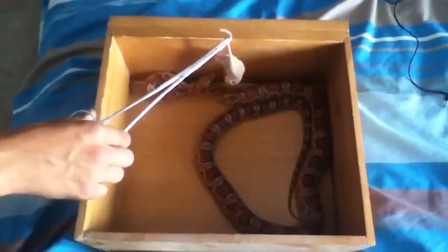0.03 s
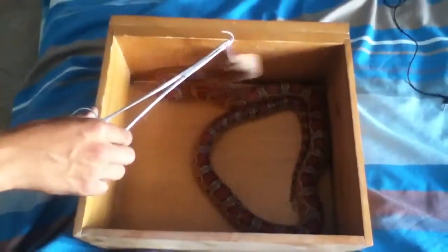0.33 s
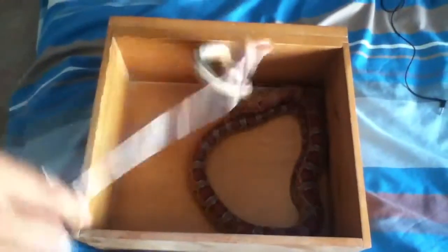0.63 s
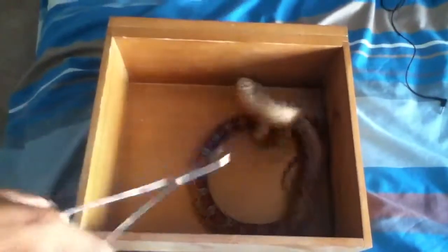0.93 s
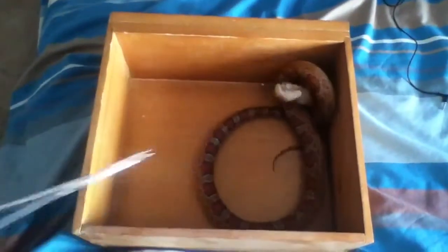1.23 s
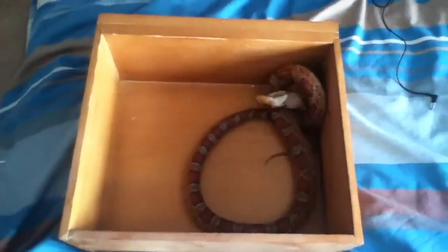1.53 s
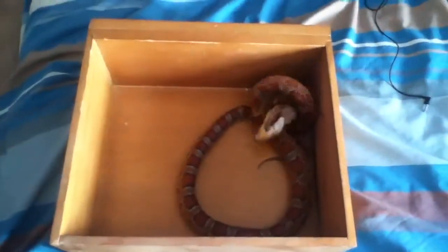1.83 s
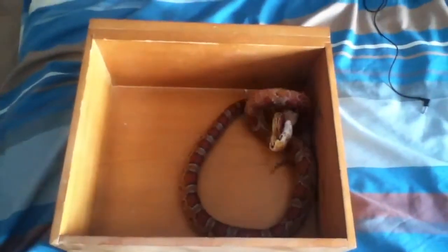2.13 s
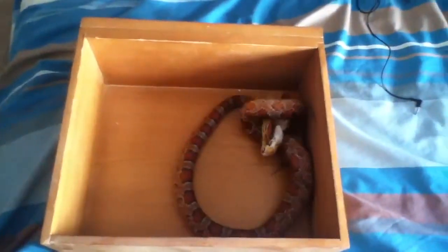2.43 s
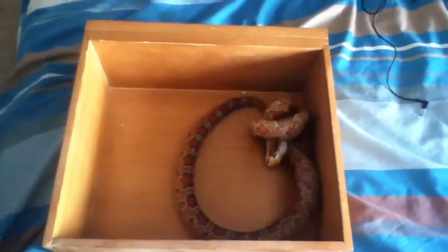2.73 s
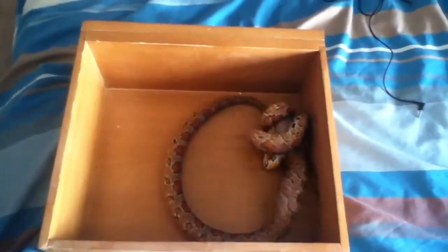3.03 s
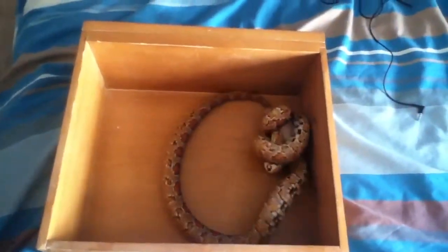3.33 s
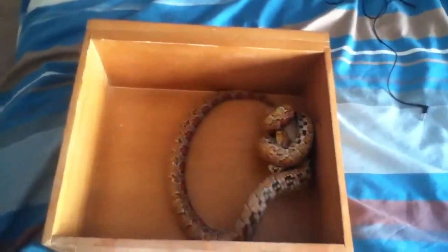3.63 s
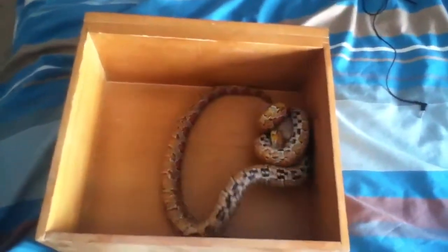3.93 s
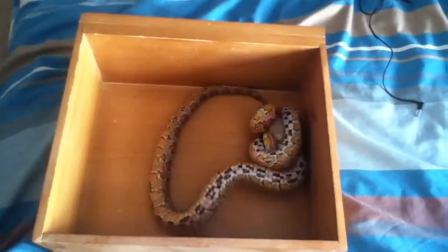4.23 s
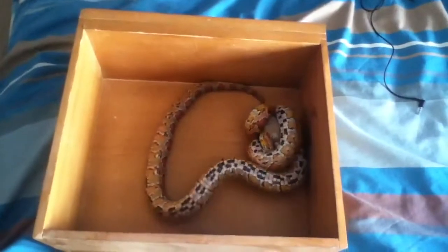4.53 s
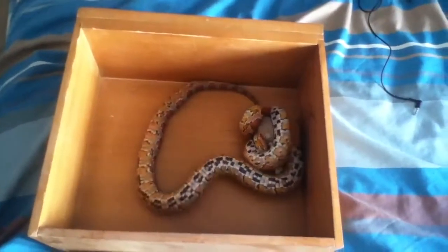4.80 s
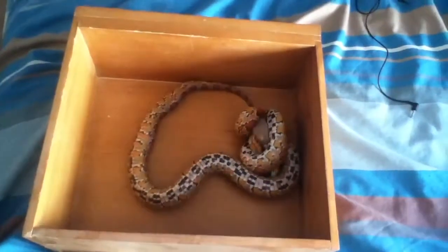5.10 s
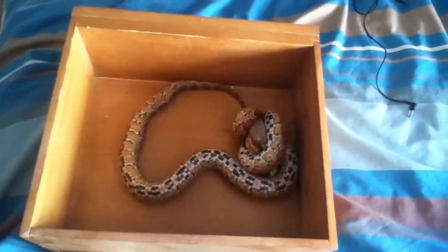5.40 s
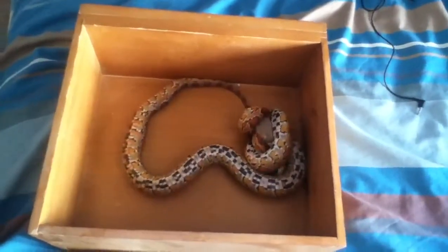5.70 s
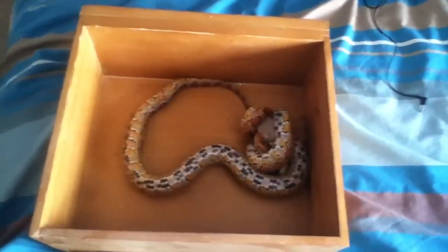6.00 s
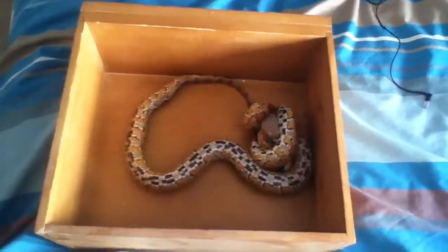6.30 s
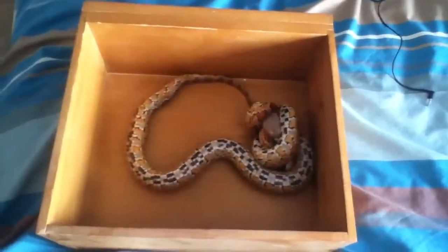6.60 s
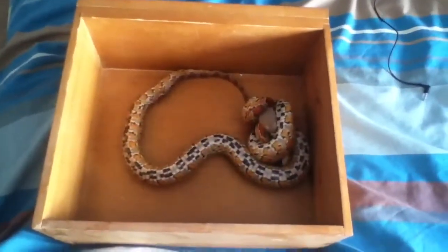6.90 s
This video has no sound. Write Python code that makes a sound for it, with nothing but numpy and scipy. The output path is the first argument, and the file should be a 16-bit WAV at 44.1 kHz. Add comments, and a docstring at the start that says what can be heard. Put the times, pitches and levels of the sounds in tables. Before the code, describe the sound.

Faint scuffs, then a single wooden thump with a hard snap as a snake lands with its prey, followed by very soft rustling.

```python
"""Room noise, microphone hiss and a few very faint high chirps run throughout.
A snake shifts in an open wooden box and at 0.6 s lunges at a mouse held out on steel tongs.
At 0.9 s both land on the box floor: one low thump rings the boards and the small room, with a hard snap.
Scales and fur rustle on, then the coils rub and nudge the wood."""
import sys
import numpy as np
from scipy import signal
from scipy.fft import rfft, irfft
from scipy.io import wavfile

SR = 44100
rng = np.random.default_rng(int(sys.argv[2]) if len(sys.argv) > 2 else 0)


def wav_record(signal):
    """Record a signal, one row per channel, as 16-bit PCM in the file named by sys.argv[1]."""
    frames = np.transpose(np.atleast_2d(signal))
    bounded = np.clip(frames, -1, 1)
    # unit amplitude maps onto the largest positive 16-bit level
    quanta = np.round(bounded * 32767).astype(np.int16)
    wavfile.write(sys.argv[1], SR, quanta)


N = 315315
T = np.arange(N) / SR


def undb(db):
    """Decibels to gain."""
    return 10 ** (np.asarray(db) / 20)


def unit(x):
    """Scale to rms 1."""
    return x / np.sqrt(np.mean(x ** 2))


def fade(t, t60_s):
    """Exponential decay from t = 0."""
    return (t >= 0) * np.exp(-np.log(1000) * np.maximum(t, 0) / t60_s)


def swell(middle_s, length_s):
    """Gaussian rise and fall, 9 dB down at both ends of its length."""
    return np.exp(-(2 * (T - middle_s) / length_s) ** 2)


def effort(moves, rest_gain):
    """Gain over time: swells add in power to a resting gain."""
    power = sum((undb(db) * swell(middle_s, length_s)) ** 2 for middle_s, length_s, db in moves)
    return np.sqrt(rest_gain ** 2 + power)


def butter(x, cutoff_hz, kind="low", order=2):
    """Butterworth filter."""
    return signal.sosfilt(signal.butter(order, cutoff_hz, kind, fs=SR, output="sos"), x)


def colour(x, points):
    """Shape the spectrum by (freq_hz, gain_db) points; rms 1."""
    hz, db = np.transpose(points)
    f = np.maximum(np.fft.rfftfreq(N, 1 / SR), 1)
    return unit(irfft(rfft(x) * undb(np.interp(np.log(f), np.log(hz), db)), N))


def band(x, hz, octaves):
    """Bell-shaped band; rms 1."""
    f = np.maximum(np.fft.rfftfreq(N, 1 / SR), 1)
    return unit(irfft(rfft(x) * np.exp(-.5 * (np.log2(f / hz) / octaves) ** 2), N))


def grit(spread_db, grain_samples=40):
    """Friction noise: short grains of random strength."""
    strength = undb(spread_db * rng.standard_normal(N // grain_samples + 1))
    return np.repeat(strength, grain_samples)[:N] * rng.standard_normal(N)


def ring(modes):
    """Free ringing of modes, 0.5 s; polarity 1 swings with the push, -1 against it."""
    t = T[:SR // 2]
    return sum(np.sign(polarity) * undb(db) * np.cos(2 * np.pi * hz * t) * fade(t, t60_s)
               for hz, db, t60_s, polarity in modes)


def background(air_db=-57.5, drone_hz=57.7, whine_hz=14993, whine_db=-89):
    """Room noise, microphone hiss, a wavering drone that swells once, a thin electronic whine."""
    # noise and hiss spectrum: freq_hz, density_db
    air_spectrum = [(12, -47), (20, -4), (27, -17), (47, -10), (81, -1.5), (112, 0.5), (219, -2), (259, -4),
                    (405, -6.5), (988, -15.5), (1200, -14.5), (2100, -17), (3870, -18), (10300, -20),
                    (15600, -25)]
    air = undb(air_db) * colour(rng.standard_normal(N), air_spectrum)
    drone_gain = undb(-76) + undb(-67.5) * swell(middle_s=1.54, length_s=.62)
    waver = band(rng.standard_normal(N), drone_hz, octaves=0.089)
    drone = drone_gain * unit(np.sin(2 * np.pi * drone_hz * T) + .5 * waver)
    whine = undb(whine_db) * unit(np.sin(2 * np.pi * whine_hz * T))
    return air + drone + whine


def chirps(length_s=.1, min_smear_hz=130, smear_share=.7):
    """Falling chirps, perhaps a distant bird; the steeper the fall, the more smeared."""
    # calls: middle_s, level_db, pitch_hz, fall_ratio
    calls = [(0.025, -70, 4070, 0.041), (0.395, -68, 4350, .02), (1.136, -68.5, 4340, 0.0235),
             (2.72, -64.5, 4600, 0.17), (3.93, -68, 4050, .06), (4.834, -67, 4270, .04)]
    noise, out = rng.standard_normal(N), 0
    for middle_s, db, hz, fall in calls:
        u = (T - middle_s) / length_s
        pitch_hz = hz * (1 - fall * np.clip(u, -1, 1))
        tone = np.sin(2 * np.pi * np.cumsum(pitch_hz) / SR)
        smear_hz = np.hypot(min_smear_hz, smear_share * fall * hz)
        blur = unit(butter(noise, smear_hz))
        out += undb(db) * np.exp(-2 * u ** 2) * blur * tone
    return np.sqrt(2) * out


def room(x, wet_db=-18, t60_s=0.306, first_wall_s=0.018, build_s=0.03, low_hz=340, high_hz=2800):
    """Small furnished room: midrange reflections thicken after the first wall, then die fast."""
    t = T[:SR // 2] - first_wall_s
    build = 1 - np.exp(-np.maximum(t, 0) / build_s)
    tail = rng.standard_normal(len(t)) * fade(t, t60_s) * build
    tail /= np.sqrt(np.sum(tail ** 2))
    tail = butter(tail, high_hz, order=1)
    tail = butter(tail, low_hz, "high")
    return x + undb(wet_db) * signal.fftconvolve(x, tail)[:N]


def rub(grip_db=-77.5):
    """Tightening coils drag along the wall; the wood murmurs."""
    # wood resonances: centre_hz, width_octaves, gain_db
    resonances = [(348, 0.54, 2.5), (532, 0.049, -7.5), (669, 0.086, -1)]
    # coil presses: middle_s, length_s, level_db
    squeezes = [(.03, 0.24, -62), (.62, 0.34, -63.5), (3.77, 0.18, -60), (4.7, 1.4, -70.5)]
    slips = grit(spread_db=4, grain_samples=300)
    murmur = unit(sum(undb(db) * band(slips, hz, octaves) for hz, octaves, db in resonances))
    return effort(squeezes, undb(grip_db)) * murmur


def slide(spurt_hz=9, spurt_db=1.6, creep_db=-67.5, creep_db_per_s=-1):
    """Belly scales catch and slip in spurts; the creep between shifts fades as the snake settles."""
    # body shifts: middle_s, length_s, level_db
    moves = [(0.01, .12, -67), (.485, 0.13, -56), (.645, .11, -56.5), (.83, 0.11, -55.5), (.912, 0.08, -47),
             (1.25, 0.21, -57.5), (2.03, 0.39, -67), (3.05, 0.51, -64), (4.2, 0.89, -68.5),
             (5.42, 0.89, -64.5)]
    # sliding-scale spectrum: freq_hz, density_db
    scale_spectrum = [(150, -4), (450, -4.5), (900, -1), (1800, -6.5), (3000, -7), (4500, -8), (7000, -12),
                      (11000, -15), (16000, -34)]
    spurts = undb(spurt_db * band(rng.standard_normal(N), spurt_hz, octaves=0.64))
    friction = colour(grit(spread_db=1.9), scale_spectrum)
    return effort(moves, undb(creep_db + creep_db_per_s * T)) * spurts * friction


def nudges(rise_s=0.0017):
    """Each slow push of the body wakes one resonance of the wood."""
    # light pushes: start_s, level_db, pitch_hz, t60_s
    pushes = [(0.703, -40, 476, 0.077), (.708, -47, 410, 0.14), (.738, -48, 490, 0.15),
              (0.842, -54, 226, 0.11), (1.205, -49.5, 759, 0.2), (1.215, -49.5, 378, 0.2),
              (5.037, -45, 120, 0.13), (5.04, -49.5, 230, 0.08), (5.39, -47.5, 401, 0.11)]
    out = 0
    for start_s, db, hz, t60_s in pushes:
        t = np.maximum(T - start_s, 0)
        out += undb(db) * np.sin(2 * np.pi * hz * t) * fade(t, t60_s) * (1 - np.exp(-t / rise_s))
    return out


def scuffs(width_octaves=0.76, rise_s=0.0013):
    """Scales, fur and tongs scrape briefly, each scrape in its own band."""
    # scrapes: start_s, level_db, centre_hz, t60_s
    scrapes = [(0.587, -47, 2510, 0.12), (.676, -50, 4000, 0.028), (.702, -48, 1404, 0.037),
               (.845, -49, 1290, .045), (.897, -39.5, 1440, 0.21), (.912, -44, 7500, 0.031),
               (1.11, -50, 4500, 0.022), (1.204, -57, 1480, 0.18), (1.225, -53, 6070, .07),
               (1.24, -49, 1640, 0.11), (1.381, -54, 2200, .035), (2.875, -60.5, 1150, .3),
               (3.08, -65, 2800, 0.31)]
    grains, out = grit(spread_db=3.0), 0
    for start_s, db, hz, t60_s in scrapes:
        t = T - start_s
        envelope = fade(t, t60_s) * np.clip(t / rise_s, 0, 1)
        out += undb(db) * band(grains, hz, width_octaves) * envelope
    return out


def snaps(cushion_hz=7000, buzz_db=-9.5, buzz_hz=4640, buzz_t60_s=0.053):
    """Hard contacts ring and buzz: lightly at the lunge, sharply with a chatter on landing."""
    # hard contacts: start_s, level_db
    contacts = [(0.5943, -40.5), (0.902, -25.5), (0.909, -45)]
    # bright modes, perhaps the tong tips: pitch_hz, gain_db, t60_s, polarity
    tip_modes = [(4360, -8.5, .014, 1), (4380, -23, 0.046, 1), (4630, -1, 0.0067, 1), (4780, -18, 0.018, 1),
                 (4930, -12, 0.013, 1), (8050, -8, .01, 1)]
    taps = np.zeros(N)
    for start_s, db in contacts:
        taps[int(start_s * SR)] = undb(db)
    ringing = signal.fftconvolve(butter(taps, cushion_hz), ring(tip_modes))[:N]
    buzz_envelope = sum(undb(db) * fade(T - start_s, buzz_t60_s) for start_s, db in contacts)
    buzz = band(rng.standard_normal(N), buzz_hz, octaves=0.19) * buzz_envelope
    return ringing + undb(buzz_db) * buzz


def thump(radiate_hz=158):
    """Soft blows of the snake's body ring the box."""
    # lunge, brush, first touch, full landing: time_s, level_db, softness_ms
    blows = [(0.593, -44, 0.09), (0.8473, -39, 0.19), (0.899, -12.5, 0.49), (0.9021, -0.14, 0.31)]
    # floor and wall modes, the widest being the loaded board's thud: pitch_hz, gain_db, t60_s, polarity
    box_modes = [(160, -15.5, .089, 1), (157, -34, .33, 1), (227, -11.5, .115, 1), (276, -20.8, .23, 1),
                 (305, -.7, .005, 1), (308, -21.8, .195, 1), (366, -12.6, .102, 1), (385, -29, .3, 1),
                 (416, -18.5, .06, -1), (498, -29, .14, 1), (572, -22, .05, 1), (594, -27, .25, 1),
                 (623, -31, .29, -1), (641, -30, .27, -1), (746, -26, .11, 1), (790, -28, .09, 1),
                 (997, -21, .09, 1), (1080, -22, .16, 1), (1232, -16, .07, 1), (1365, -9, .06, 1)]
    force = 0
    for time_s, db, softness_ms in blows:
        push = np.exp(-.5 * ((T - time_s) * 1000 / softness_ms) ** 2)
        force += undb(db) * push / push.sum()
    boards = signal.fftconvolve(force, ring(box_modes))[:N]
    # floor driven away from the listener; a small board radiates little bass
    return -butter(boards, radiate_hz, "high")


def scene():
    """Box sounds through the room, over chirps and background."""
    box = thump() + snaps() + scuffs() + nudges() + slide() + rub()
    return (room(box) + chirps() + background())[None]


def record(dry):
    """Steep low-pass on the top treble."""
    top_hz = 15750
    return signal.sosfilt(signal.ellip(12, .1, 70, top_hz, fs=SR, output="sos"), dry)


dry = scene()
out = record(dry)
wav_record(out)
```